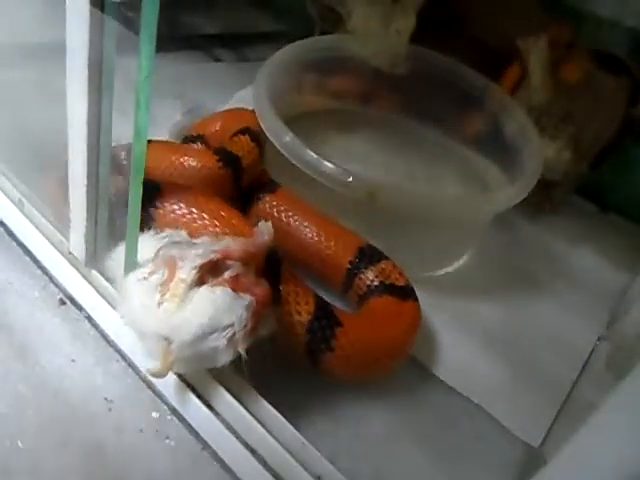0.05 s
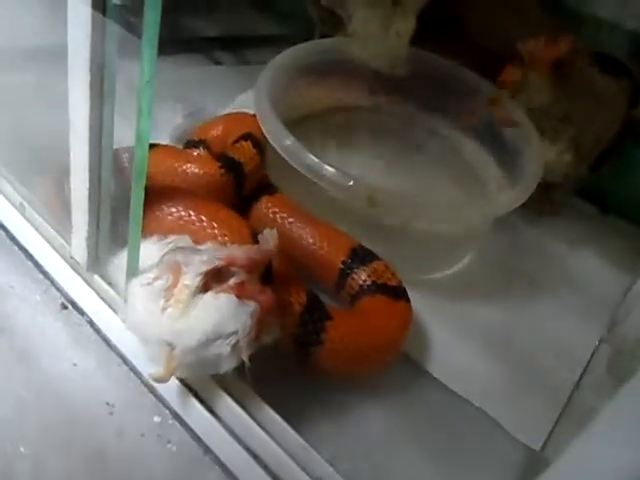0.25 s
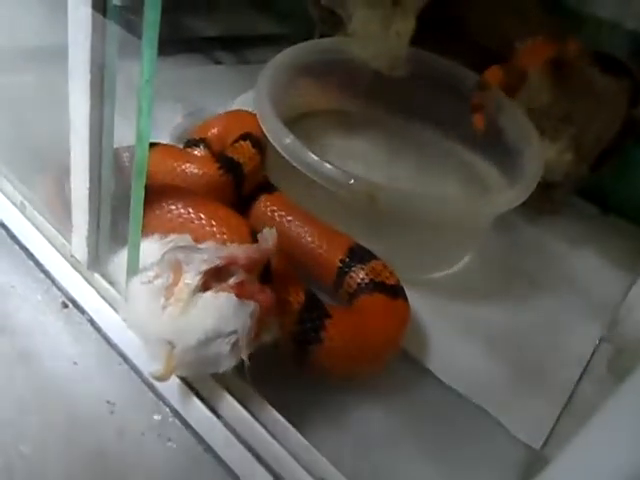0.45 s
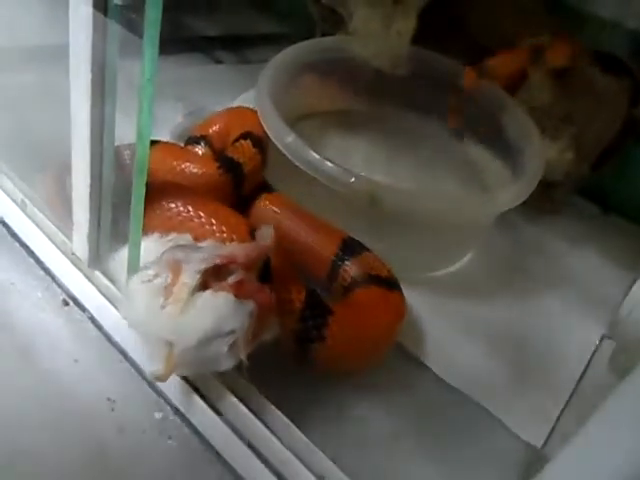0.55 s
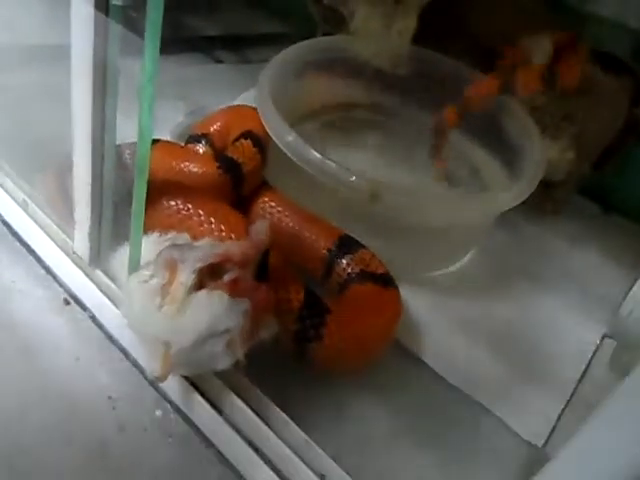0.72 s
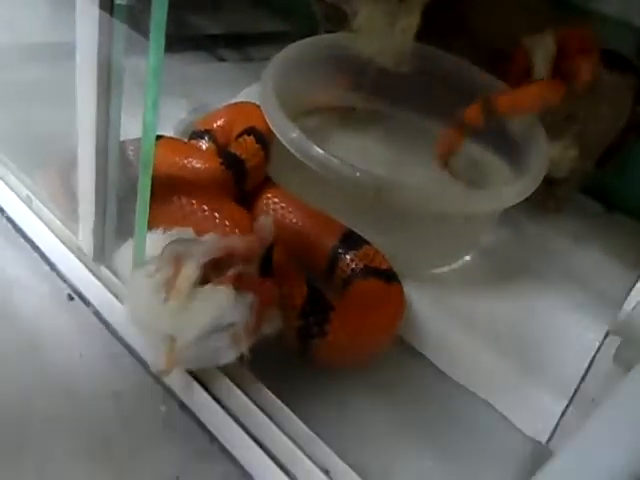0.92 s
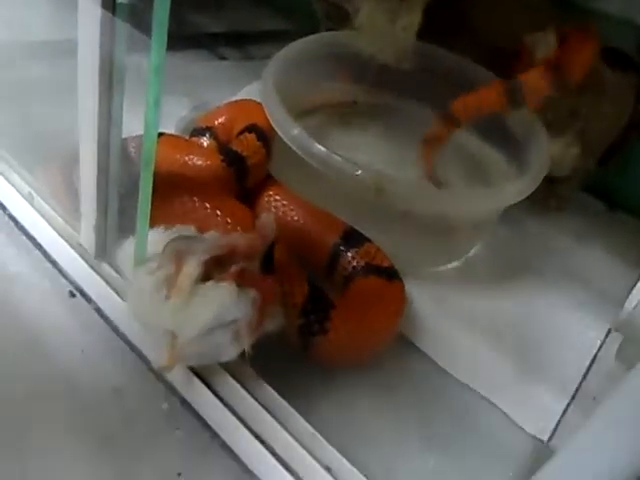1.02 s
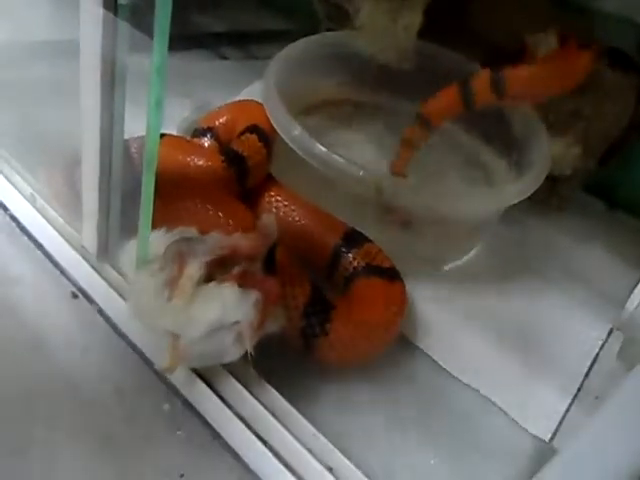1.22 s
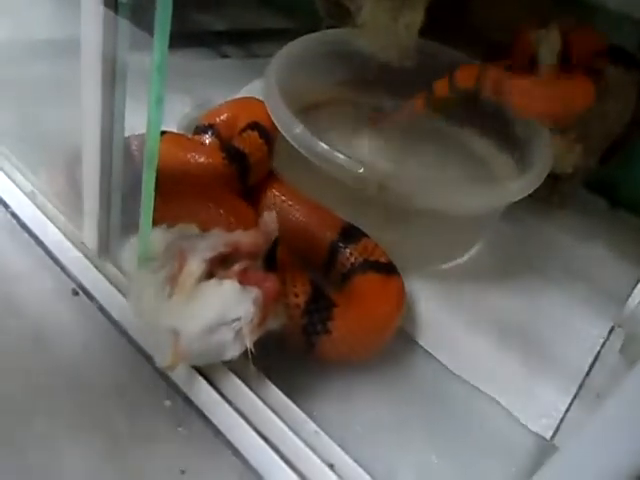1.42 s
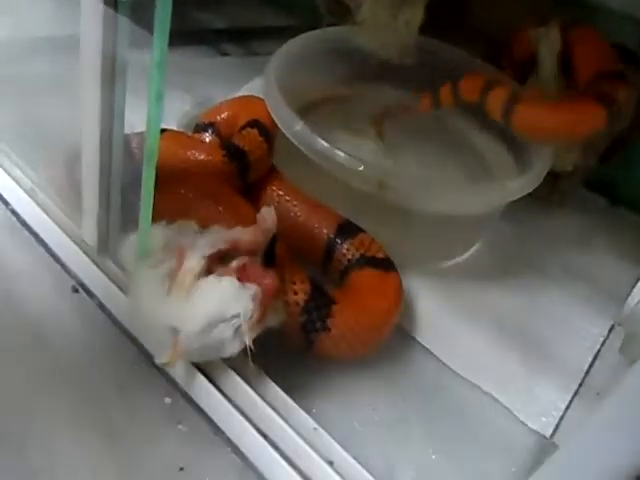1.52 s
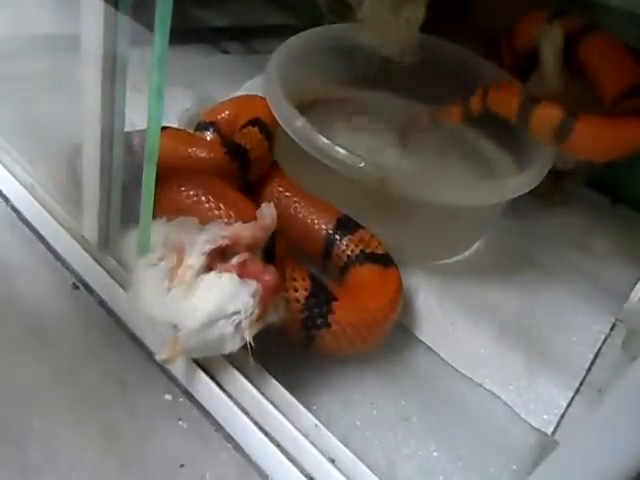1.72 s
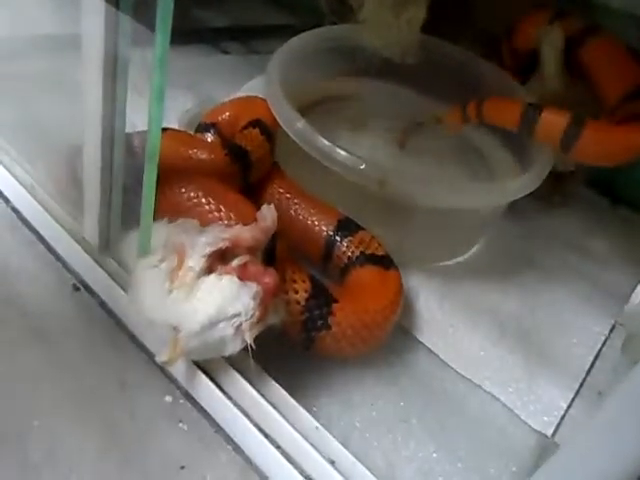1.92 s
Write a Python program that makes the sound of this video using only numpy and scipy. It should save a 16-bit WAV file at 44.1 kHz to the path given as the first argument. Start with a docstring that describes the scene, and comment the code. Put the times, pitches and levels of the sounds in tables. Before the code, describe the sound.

Knocks on a glass enclosure indoors: one hollow bump, then a quick cluster of four sharp, briefly ringing knocks. Soft low thuds and rustles follow as a hand shifts on the nearby camera, over faint hum and hiss.

```python
"""Knocks on a glass enclosure

Indoors, a bump excites the hollow modes of a glass enclosure; four sharp knocks then rattle it,
each ringing the panel and scattering a bright crack round the box. A hand shifts on a nearby
camera with soft thuds and rustles, over light ticks, mains hum and faint hiss."""
import sys
import numpy as np
from scipy import signal
from scipy.fft import rfft, irfft
from scipy.io import wavfile

SR = 44100
rng = np.random.default_rng(int(sys.argv[2]) if len(sys.argv) > 2 else 0)


def int16_out(signal):
    """Quantize to a 16-bit WAV file."""
    q = np.round(np.clip(np.atleast_2d(signal).T, -1, 1) * 32767)
    wavfile.write(sys.argv[1], SR, q.astype(np.int16))


N = 85995
T = np.arange(N) / SR


# knocks: t/s, ring level/dB, tilt/(dB/octave), crack level/dB, snap level/dB, snap f/Hz, boom level/dB
KNOCKS = [(0.6460, -9.5, 0, -9, -9.5, 9900, -7), (0.7020, -1, 0.93, 2.5, -0.5, 9500, 0.5),
          (0.7721, -2, -1, -5, -7, 14150, -5), (0.7890, -9.5, -1, -8, -10.5, 14100, -6.5)]
# panel modes: f/Hz, relative level/dB, T60/s
PANEL_MODES = [(308, -29.5, 0.19), (690, -24.8, 0.15), (925, -22.3, 0.088), (1324, -23.9, 0.1),
               (1538, -31.4, 0.119), (1592, -14, 0.085), (1826, -28.5, 0.09), (1947, -19, 0.09),
               (2340, -23.9, 0.038), (2424, -41.3, 0.116), (2543, -27.1, 0.085), (2598, -18.5, 0.025),
               (2728, -22.9, 0.037), (3132, -33.1, 0.051), (3270, -33.7, 0.085), (3308, -27.3, 0.049),
               (3656, -31.5, 0.037), (3915, -27.5, 0.058), (4325, -28.5, 0.04), (4510, -28, 0.035)]
# crack spectrum: f/Hz, relative level/dB
CRACK_SPECTRUM = [(300, -6.5), (1100, -6.5), (1700, 6.5), (2150, -12.5), (2650, 7.5), (3030, -8),
                  (3300, -1), (4400, -3), (5200, -1), (6500, 2), (8000, -7.5), (9700, 1), (12500, -7),
                  (16000, -30)]
# crack decay: f/Hz, T60/s
CRACK_DECAY = [(1000, 0.21), (2600, 0.049), (5000, 0.052), (9000, 0.029), (15000, 0.026)]

def knocks():
    """Impulse response of a panel: a hard contact gives a snap, a crack, ringing modes and a boom."""
    out = np.zeros(N)
    crack = burst(CRACK_SPECTRUM, CRACK_DECAY)
    boom = ring(hz=145, rise_s=0.013, hold_s=0.041, t60=0.052)
    for s, ring_db, tilt, crack_db, snap_db, snap_hz, boom_db in KNOCKS:
        add(out, s, amp(snap_db - 0.5) * snap(snap_hz))
        add(out, s, amp(crack_db - 22.5) * crack)
        for hz, db, t60 in PANEL_MODES:
            slow = np.sqrt(1000 / hz)  # low modes build up later
            mode = ring(hz, rise_s=0.0057 * slow, hold_s=0.0038 * slow, t60=t60)
            add(out, s, amp(ring_db + db + tilt * np.log2(hz / 1000)) * mode)
        add(out, s, amp(boom_db - 24) * boom)
    return out


# spectrum of first contact: f/Hz, relative level/dB
SNAP_SPECTRUM = [(1000, -9.5), (3000, -1), (4500, -13), (7500, 0.5), (10000, 1), (12500, -2), (14200, -4),
                 (16000, -11)]

def snap(peak_hz, peak_db=9, width_hz=980, size=512):
    """Minimum phase puts the energy of this bright click at its front."""
    hz = np.fft.rfftfreq(size, 1 / SR)
    gain = amp(read(SNAP_SPECTRUM, hz) + peak_db * np.exp(-((hz - peak_hz) / width_hz) ** 2))
    log_gain = np.log(np.r_[gain, gain[-2:0:-1]])
    click = np.fft.ifft(np.exp(signal.hilbert(log_gain)).conj()).real
    return click / np.linalg.norm(click)


# bump and rebounds: t/s, level/dB, level change one octave from 750 Hz/dB
BUMPS = [(0.2190, 0, 0), (0.2866, -26.5, 2), (0.3038, -19.5, -10.5)]
# hollow modes: f/Hz, relative level/dB, T60/s, hold/s
ENCLOSURE_MODES = [(182, -22.5, 0.085, 0.006), (238, -31.5, 0.3, 0.006), (603, -31.6, 0.25, 0.021),
                   (617, -17.5, 0.042, 0.026), (672, -30.1, 0.103, 0.018), (849, -21.3, 0.14, 0.021),
                   (895, -36, 0.27, 0.017), (1086, -34.9, 0.034, 0.025), (1243, -24.1, 0.016, 0.011),
                   (1281, -19.7, 0.105, 0.012), (1313, -25, 0.1, 0.04), (1401, -35.7, 0.097, 0.024),
                   (1468, -34, 0.08, 0.012), (1527, -27.3, 0.128, 0.016), (1595, -27.3, 0.155, 0.017),
                   (1973, -30.9, 0.095, 0.025), (2030, -39.5, 0.044, 0.033), (2224, -39.6, 0.064, 0.031),
                   (2484, -37.8, 0.102, 0.013), (2675, -30.6, 0.102, 0.003)]
# contact noise spectrum: f/Hz, relative level/dB
CONTACT_SPECTRUM = [(150, -11), (400, -7), (700, -23.5), (1400, 5.5), (1850, -9.5), (2650, -11.5),
                    (3300, -8.5), (6200, -17), (8000, -12.5), (11000, -23.5), (15500, -50)]
# contact noise decay: f/Hz, T60/s
CONTACT_DECAY = [(500, 0.25), (2600, 0.14), (5000, 0.065), (12000, 0.069)]

def bumps():
    """Modal superposition: a blunt blow and two soft rebounds ring the hollow enclosure."""
    out = np.zeros(N)
    for s, db, curve_db in BUMPS:
        for hz, mode_db, t60, hold_s in ENCLOSURE_MODES:
            rise_s = 0.0013 * np.sqrt(1000 / hz)
            gain = amp(db + mode_db + curve_db * np.log2(hz / 750) ** 2)
            add(out, s, gain * ring(hz, rise_s, hold_s, t60))
    add(out, BUMPS[0][0], amp(-27) * burst(CONTACT_SPECTRUM, CONTACT_DECAY))
    return out


def ring(hz, rise_s, hold_s, t60):
    """Bending-wave dispersion: treble arrives first; the mode builds up, holds and decays."""
    travel_s = 0.00188 * np.sqrt(1000 / hz)
    t = np.maximum(T[:SR // 2] - travel_s, 0)
    decay = 1e-3 ** (np.maximum(t - hold_s, 0) / t60)
    return np.sin(2 * np.pi * hz * t) * (1 - np.exp(-t / rise_s)) * decay


def burst(spectrum, t60s, size=22050, count=12):
    """Frequency-dependent damping: dense ringing is noise whose bands each decay at their own rate."""
    hz, centres = np.fft.rfftfreq(size, 1 / SR), np.geomspace(150, 16000, count)
    bins = rfft(coloured(spectrum)[:size])
    out = np.zeros(size)
    for centre, share in zip(centres, np.eye(count)):
        band = irfft(bins * read(list(zip(centres, share)), hz), size)
        out += band * 1e-3 ** (T[:size] / read(t60s, centre))
    return out


# grip rumble envelope: t/s, level/dB
GRIP_ENVELOPE = [(0, -70), (.55, -68), (.68, -37.5), (.85, -42), (1.02, -43), (1.25, -50.5), (1.33, -42),
                 (1.49, -39), (1.56, -43), (1.7, -51.5), (1.83, -52.5), (1.95, -50.5)]
# rumble spectrum: f/Hz, relative level/dB
RUMBLE_SPECTRUM = [(15, 3), (35, 7.5), (100, -3.5), (200, -4), (300, -23.5), (500, -28.5), (1200, -39),
                   (4000, -42), (16000, -49)]
# pushes of the hand: t/s, level/dB, f/Hz
THUDS = [(0.601, -37, 79.4), (0.856, -40, 91), (0.895, -26, 56.3), (0.964, -32, 80.1), (0.979, -30.5, 160),
         (0.989, -33.5, 45), (1.056, -31, 38.7), (1.079, -38.5, 192), (1.086, -30, 93),
         (1.179, -35.5, 49.5), (1.227, -31.5, 42.7), (1.286, -22.5, 92), (1.31, -29.5, 196),
         (1.326, -26, 132), (1.355, -37, 195), (1.365, -29.5, 48), (1.409, -31.5, 65.5),
         (1.443, -31.5, 123), (1.469, -28, 172), (1.491, -33.5, 84.6), (1.586, -27.5, 60),
         (1.644, -30.5, 74.4), (1.764, -34.5, 58), (1.819, -37.5, 65)]

def handling(thud_cycles=0.31):
    """Structure-borne sound: a hand pushes on the camera body, and its grip sticks and slips."""
    grip = amp(np.interp(T, *np.transpose(GRIP_ENVELOPE)))
    out = grip * waver(db=2.5) * coloured(RUMBLE_SPECTRUM)
    for s, db, hz in THUDS:
        cycles = (T - s) * hz
        out += amp(db) * np.cos(2 * np.pi * cycles) * np.exp(-.5 * (cycles / thud_cycles) ** 2)
    return out


# rustles and the glass's after-ring: t/s, duration/s, level/dB, centre f/Hz, width/octaves
NOISE_SWELLS = [(0.067, 0.044, -57.5, 6130, 0.63), (0.042, 0.44, -56, 1800, 0.59),
                (0.222, 0.16, -49.5, 2360, 0.61), (0.291, 0.14, -51, 2580, 0.066),
                (0.672, 0.029, -50, 8300, 0.28), (0.752, 0.01, -55, 9900, 2.2),
                (1.294, 0.049, -60, 784, 0.73), (1.441, 0.048, -52, 3340, 0.79),
                (1.648, 0.042, -53.5, 1860, 0.77), (1.806, 0.12, -60, 3840, 0.86)]

def rustles_and_after_ring():
    """Band-limited noise: soft rustles, and the glass's faint narrow ring near 2.6 kHz after the bump."""
    out = np.zeros(N)
    for s, length, db, hz, octaves in NOISE_SWELLS:
        band = noise(lambda f: np.exp(-.5 * (np.log2((f + 1) / hz) / octaves) ** 2))
        out += amp(db) * np.exp(-(2 * (T - s) / length) ** 2) * waver(db=2.5) * band
    return out


# light contacts: t/s, level/dB, T60/s
TICKS = [(0.219, -43, 0.0094), (0.2867, -44, 0.04), (0.4951, -51, 0.0435), (0.6583, -34, 0.012),
         (0.6841, -36.5, 0.031), (0.7124, -28.5, 0.011), (1.065, -51, 0.039), (1.225, -43.5, 0.022),
         (1.3287, -49, 0.049)]

def ticks(strays_per_s=22):
    """A Poisson process scatters faint crackle under a few clear ticks."""
    onsets = rng.random(N) < strays_per_s / SR
    stray_db = -68 + 2 * np.minimum(rng.exponential(1, N), 2)
    out = signal.fftconvolve(onsets * amp(stray_db), tick(t60=0.0207))[:N]
    for s, db, t60 in TICKS:
        add(out, s, amp(db) * tick(t60))
    return out


# tick spectrum: f/Hz, relative level/dB
TICK_SPECTRUM = [(1000, -12), (5500, -12), (8800, -7.5), (11500, -11), (16000, -27)]

def tick(t60):
    """Exponential decay of bright noise after a light contact."""
    return amp(-60 * T / t60) * coloured(TICK_SPECTRUM)


# room decay: f/Hz, T60/s
ROOM_DECAY = [(150, 0.44), (800, 0.14), (2600, 0.19), (6000, 0.13), (14000, 0.045)]

def room(x, delay_s=0.012, level_db=-21):
    """Reverberation: convolution with a short, diffuse tail."""
    tail = burst([(20, 0), (20000, 0)], ROOM_DECAY)
    out = np.zeros(N)
    add(out, delay_s, signal.fftconvolve(x, tail / np.linalg.norm(tail)))
    return amp(level_db) * out


# mains harmonics: f/Hz, rms level/dB
HUM_HARMONICS = [(50, -63), (100, -61), (150, -59.5), (200, -60)]
# resonances in the hiss: f/Hz, width/Hz, rms level/dB
HISS_RESONANCES = [(578.6, 58, -61), (1547, 17, -66.5), (1709, 110, -60), (3375, 104, -64),
                   (5289, 490, -66), (9360, 120, -71.5)]
# hiss spectrum: f/Hz, relative level/dB
HISS_SPECTRUM = [(15, -36), (40, 3), (52, -1), (78, -19), (200, -14.5), (290, -24), (480, -24),
                 (700, -19.5), (1000, -24), (1800, -24), (2700, -33.5), (4300, -38), (7500, -32),
                 (11000, -36), (15600, -47), (16500, -69)]

def background():
    """Noise floor: a harmonic series of mains hum, and broadband hiss with wavering resonances."""
    hum = sum(amp(db) * unit(np.sin(2 * np.pi * (hz * T + rng.random()))) for hz, db in HUM_HARMONICS)
    whir = sum(amp(level) * waver(db=2) * noise(lambda f: 1 / (1 + 2 * ((f - hz) / width) ** 2))
               for hz, width, level in HISS_RESONANCES)
    return hum + whir + amp(-52.5) * coloured(HISS_SPECTRUM)


def waver(db, flutter_hz=24.2):
    """Random amplitude modulation: a gain that wanders by about db."""
    return unit(amp(db * noise(lambda f: 1 / (1 + (f / flutter_hz) ** 4))))


def noise(gain):
    """Spectral shaping: white noise weighted by gain(f), at rms 1."""
    return unit(irfft(rfft(rng.standard_normal(N)) * gain(np.fft.rfftfreq(N, 1 / SR)), N))


def coloured(spectrum):
    """Noise shaped by a tabulated spectrum."""
    return noise(lambda f: amp(read(spectrum, f)))


def read(points, hz):
    """Interpolation on a log-frequency axis."""
    f, value = np.transpose(points)
    return np.interp(np.log(hz + 1), np.log(f + 1), value)


def amp(db):
    """Amplitude ratio from decibels."""
    return 10 ** (np.asarray(db) / 20)


def unit(x):
    """Normalisation to rms 1."""
    return x / np.sqrt(np.mean(x ** 2) + 1e-20)


def add(mix, s, sound):
    """Superposition of a sound starting at time s."""
    part = mix[max(round(s * SR), 0):][:len(sound)]
    part += sound[:len(part)]


def scene():
    """Linear superposition of all sources; only the impacts reverberate."""
    hits = bumps() + knocks() + ticks()
    return (hits + room(hits) + handling() + rustles_and_after_ring() + background())[None]


def record(dry, cutoff_hz=16300):
    """Band limiting by a linear-phase low-pass filter."""
    lowpass = signal.firwin(401, cutoff_hz, window=("kaiser", 9), fs=SR)
    return signal.oaconvolve(dry, lowpass[None], "same")


dry = scene()
out = record(dry)
int16_out(out)
```